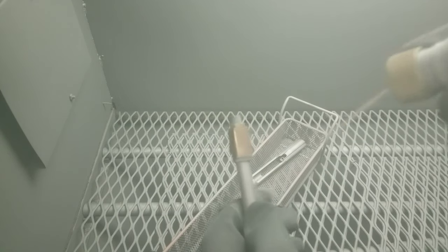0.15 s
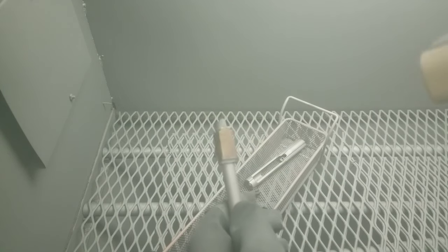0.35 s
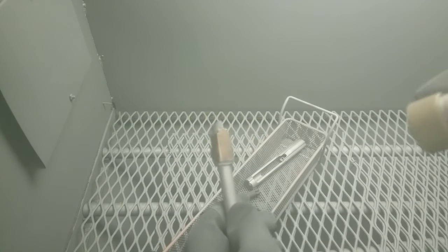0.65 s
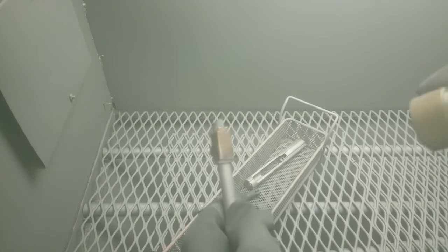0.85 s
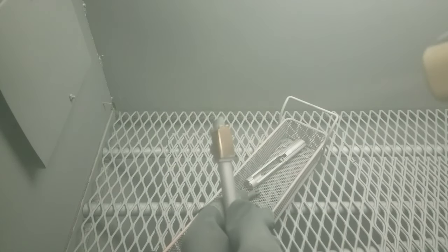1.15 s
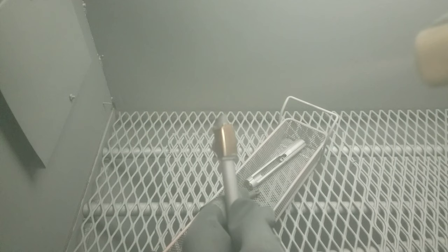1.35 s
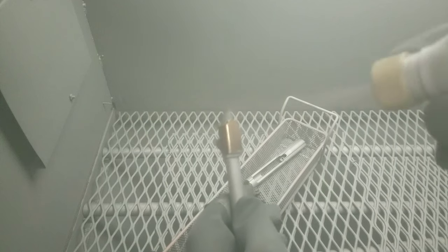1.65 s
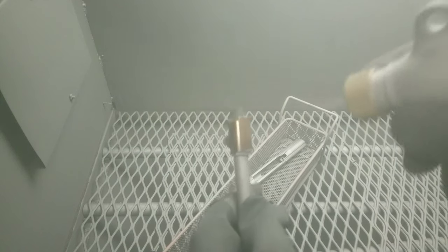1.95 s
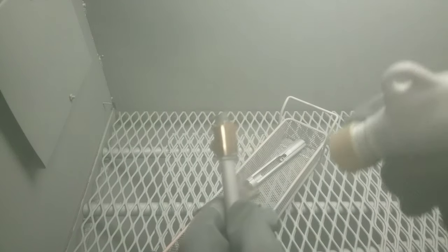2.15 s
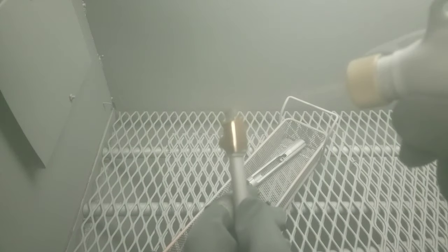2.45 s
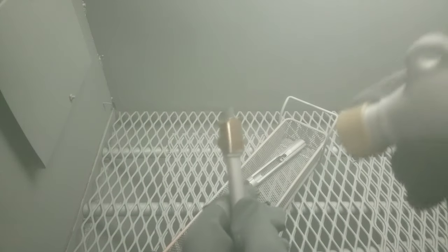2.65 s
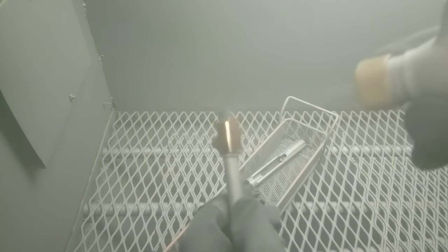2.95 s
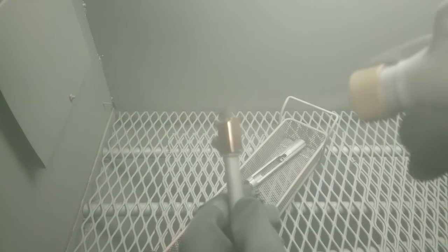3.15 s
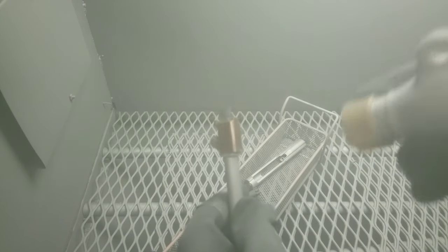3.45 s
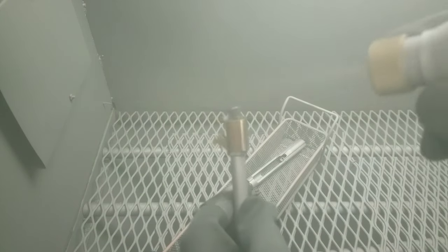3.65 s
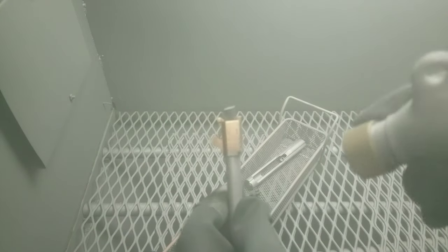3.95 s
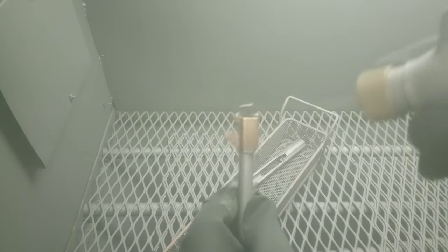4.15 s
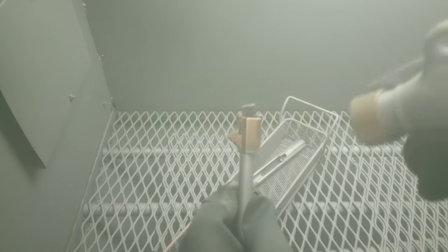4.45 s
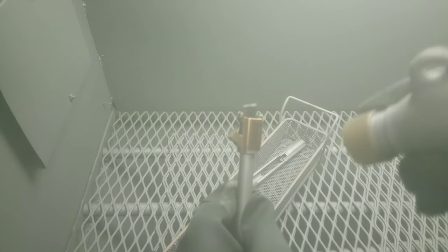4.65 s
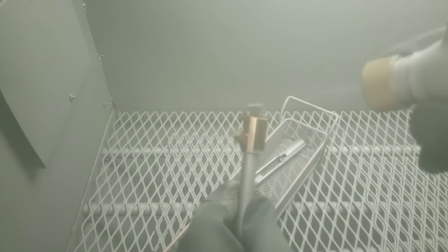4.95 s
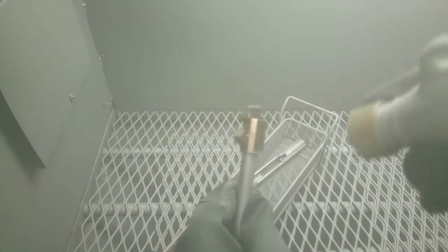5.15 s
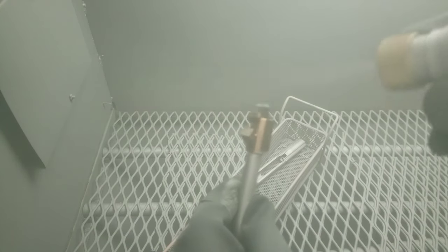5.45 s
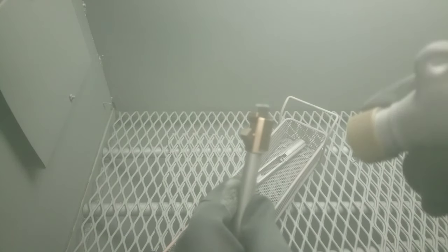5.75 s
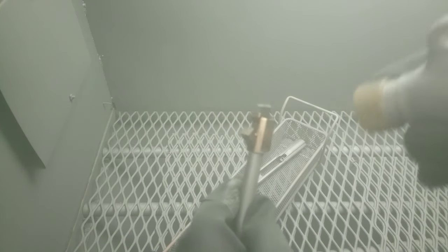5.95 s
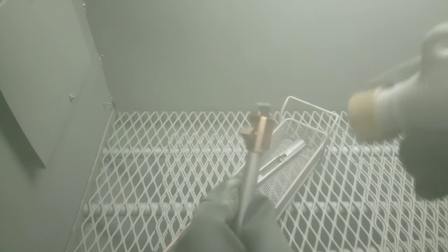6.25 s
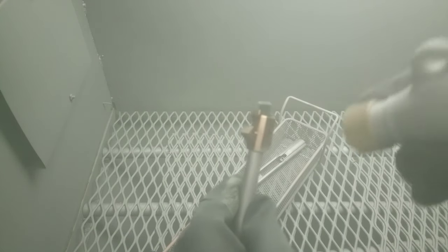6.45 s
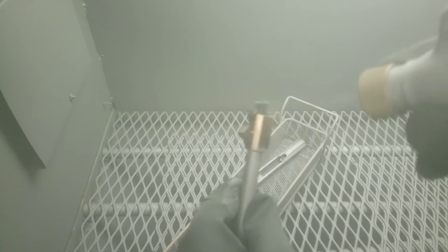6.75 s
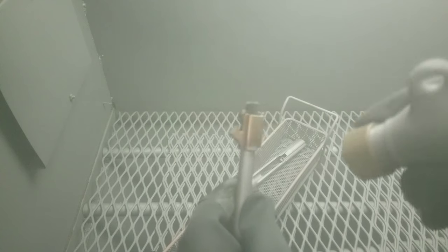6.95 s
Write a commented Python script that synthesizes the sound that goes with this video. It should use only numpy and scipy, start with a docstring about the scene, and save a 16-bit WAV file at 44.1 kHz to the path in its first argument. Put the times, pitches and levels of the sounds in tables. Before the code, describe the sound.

Inside a steel blasting cabinet, an extractor fan hums softly and a blast gun gives two brief, faintly whistling spits of air. It then opens with a bright rush into a loud, continuous hiss, peppered with fine ticks of grit. Each time the jet sweeps across a hand-held metal part, the sound swells into a rasping roar with a faint ring. It is heard up close, with a hollow, boxy tone.

```python
"""An extractor fan hums in a steel blasting cabinet. A spit of air is already dying away as the sound begins,
its nozzle whistling; the gun spits once more, then opens at 0.7 s with a bright rush and stays open. Grit comes
up the hose and ticks on the steel. The air jet hisses on and roars each time it sweeps over a hand-held metal
part; the part rings and the box booms in its air modes. Once it is loud, the camera's gain control slowly turns
down, most of all in the bass."""
import sys
import numpy as np
from scipy import signal
from scipy.fft import rfft, irfft, next_fast_len
from scipy.io import wavfile
from scipy.ndimage import uniform_filter1d, map_coordinates

SR = 44100
rng = np.random.default_rng(int(sys.argv[2]) if len(sys.argv) > 2 else 0)


def log_audio(samples):
    """Write samples as a 16-bit WAV file to the path given in sys.argv[1]."""
    # one column per channel
    frames = np.atleast_2d(samples).T
    # limit to full scale, then quantise
    limited = np.clip(frames, -1, 1)
    pcm = np.round(limited * 32767).astype(np.int16)
    wavfile.write(sys.argv[1], SR, pcm)


N = 313110
TIME_S = np.arange(N) / SR
TRIGGER_S, AIR_RISE_S, GRIT_RISE_S = 0.707, 0.03, 0.093  # grit takes longer to come up the hose
PEAK_LIMIT_SIGMA = 1.7  # caps the random peaks so the hiss does not whistle


def gun():
    """The jet hisses, strikes the part and stirs the air in the box; the grit feed flutters."""
    idle_hiss, idle_roar, idle_churn = seepage()
    roar, churn, ring = sweep()
    modes = standing_waves(width_hz=2.9, widening=0.004)
    feed_db = 0.42 * wobble(17) + 0.62 * wobble(60)
    return (jet_hiss(idle_hiss, feed_db, modes)
            + part_roar(roar + idle_roar, ring, feed_db, modes)
            + box_boom(churn + idle_churn, modes))


def jet_hiss(idle, feed_db, modes, lower_band_hz=5100, left_db=0.4):
    """The free jet: turbulent air and ticking grit, varying as the gun is moved about."""
    # jet spectrum: (frequency [Hz], level [dB])
    spectrum = [(60, -56), (200, -17.5), (700, -24), (1700, -17), (2750, -12.5), (3300, -5.5), (4300, -4),
                (5500, -0.5), (6900, 1.25), (7800, 0), (8700, -4.5), (9800, -6.5), (11500, -3.5),
                (13500, -4.5), (15500, -4.5)]
    # hiss as the gun moves: (time [s], level [dB], extra in the lower band [dB])
    course = [(0.75, -15, 2), (0.92, -12.5, -1), (1.31, -12.5, 1), (1.65, -14.5, -1.0), (1.75, -12.5, -1.5),
              (1.86, -13.5, -0.5), (2.16, -12, -1.5), (2.23, -15.5, 0.5), (2.29, -12, 0.5),
              (2.59, -12.5, -1), (2.99, -10.5, -1), (3.11, -12.5, 2.0), (3.17, -9.5, -0.5),
              (3.58, -11, 1.5), (3.72, -8.0, -1.5), (3.79, -11, -1), (4.15, -10.5, 3), (4.34, -10.0, 0),
              (4.69, -10.5, 4.0), (4.94, -10.5, 0.5), (5.03, -11, 2.5), (5.35, -11.0, 1), (5.45, -10, 2.5),
              (5.56, -11, -3.5), (5.64, -10.0, 0.5), (5.87, -12.0, 3), (6.13, -8.5, 1.5),
              (6.21, -11.5, 3.5), (6.44, -10.5, 2.5), (6.79, -11, 2.0), (7.1, -13, 4.5)]
    jet_db, lower_db = curves(course)
    strength = amp(jet_db) * opening(AIR_RISE_S) + idle
    air = in_box(spectrum, modes, modes_db=-7.5, ripple_db=1.64, ripple_hz=27.98, flicker_db=4.0)
    air = wall_echo(air, delay_s=0.000701, swing=0.2, share=0.28)
    lower = (amp(lower_db) - 1) * filtered(air, lambda hz: 1 / (1 + (hz / lower_band_hz) ** 10))
    ticks = amp(-12.5) * grit(spectrum, rate_hz=540, scatter_db=-1.5, decay_s=0.00016)
    hiss = strength * amp(feed_db) * (air + lower + ticks) + opening_rush(air)
    return hiss * amp([[left_db], [-left_db]])


def part_roar(roar, ring, feed_db, modes):
    """Air splashes off the part with a flickering colour; grit rasps on it and rings it."""
    # spectrum of the jet on the part: (frequency [Hz], level [dB])
    spectrum = [(70, -50), (200, -22.5), (320, -12), (700, -9), (1000, -6.5), (1300, -4), (1550, -2),
                (1850, -2), (2250, -1.3), (3300, -1.9), (4300, -5), (5400, -6.5), (6500, -8.5), (7600, -15),
                (9500, -22), (11500, -13), (15500, -15)]
    splash = in_box(spectrum, modes, modes_db=2.5, ripple_db=2.25, ripple_hz=16, flicker_db=5.5)
    splash = flicker(splash, depth_db=1.4, bins=16, frames=7)
    rasp = amp(-14.0) * grit(spectrum, rate_hz=300, scatter_db=3.0, decay_s=0.00048)
    flutter = amp(feed_db + 0.92 * wobble(36))
    return flutter * (roar * (splash + rasp) + ring * part_ring())


def part_ring(pitch_hz=1666, width_hz=9, lead_rad=-2.16):
    """Grit keeps the part ringing on one note."""
    noise = rng.standard_normal(N)
    return unit(filtered(noise, lambda hz: left_lead(lead_rad) * resonance(hz, pitch_hz, width_hz)))


def box_boom(churn, modes):
    """Churned air booms unevenly in the box's modes."""
    # churn spectrum: (frequency [Hz], level [dB])
    spectrum = [(25, -32), (90, -11), (150, -9.5), (230, -7), (450, -1.5), (750, -1), (1300, -4.5),
                (1700, -4), (2500, -40), (5000, -52)]
    strength = churn * amp(1.25 * wobble(24))
    return strength * in_box(spectrum, modes, modes_db=5.5, ripple_db=2.0, ripple_hz=8.1, flicker_db=2)


def sweep(edge_db=6, edge_exponent=1.13):
    """Roar, churn and ring amplitudes: they swell as the jet nears the part, hold, fade as it leaves."""
    # passes over the part: (square hit [s], hold [s], approach [s], retreat [s],
    # roar [dB], churn [dB], ring [dB])
    passes = [(0.808, 0.16, 0.065, 0.085, -25.5, -27, -40), (1.146, 0.12, 0.094, 0.05, -34.5, -33.5, -50),
              (1.52, 0.21, 0.055, 0.053, -29.5, -31, -45), (1.749, 0.005, 0.036, 0.12, -23.5, -31.5, -46),
              (2.136, 0.043, 0.068, 0.15, -16.5, -30, -33), (2.317, 0.15, 0.048, 0.217, -21, -39, -42),
              (2.75, 0.18, 0.1, 0.092, -14.5, -26.5, -25), (3.198, 0.17, 0.08, 0.088, -22, -40, -42),
              (3.454, 0.058, 0.14, 0.087, -12.5, -24.5, -23), (4.038, 0.11, 0.13, 0.091, -13.5, -25.5, -26),
              (4.608, 0.03, 0.15, 0.089, -12.5, -33, -35), (4.728, 0.036, 0.041, 0.081, -12, -27, -23),
              (5.077, 0.014, 0.17, 0.08, -19, -37, -42), (5.249, 0.093, 0.055, 0.084, -13, -26, -20.5),
              (5.445, 0.027, 0.05, 0.037, -23, -36, -42), (5.717, 0.29, 0.054, 0.19, -16.5, -31, -35),
              (6.45, 0.044, 0.084, 0.05, -11.5, -27, -30), (6.627, 0.017, 0.033, 0.028, -17.5, -41, -39),
              (7, 0.067, 0.18, 0.15, -15, -34.5, -31)]
    roar_power, churn_power, ring_power = amp(-38) ** 2, amp(-47) ** 2, 0  # jet off the part
    for hit_s, hold_s, approach_s, retreat_s, roar_db, churn_db, ring_db in passes:
        off_part = np.maximum(hit_s - TIME_S, 0) / approach_s + since(hit_s + hold_s) / retreat_s
        miss_db = edge_db * off_part ** edge_exponent
        roar_power += amp(roar_db - miss_db) ** 2
        churn_power += amp(churn_db - 0.65 * miss_db) ** 2
        ring_power += amp(ring_db - 0.88 * miss_db) ** 2
    return np.sqrt([roar_power, churn_power, ring_power]) * opening(GRIT_RISE_S)


def grit(spectrum, rate_hz, scatter_db, decay_s):
    """Single grains of uneven size tick against steel."""
    hits = (rng.random(N) < rate_hz / SR) * amp(scatter_db * np.minimum(rng.exponential(size=N), 4))
    envelope = signal.fftconvolve(hits, np.exp(-TIME_S[:SR // 100] / decay_s))[:N]
    return coloured(envelope * rng.standard_normal((2, N)), spectrum)


def opening_rush(air, rush_decay_s=0.025, ring_decay_s=0.11):
    """Pressure stored in the hose escapes in a short, bright rush that rings in the nozzle."""
    t = since(TRIGGER_S)
    bright = unit(filtered(air, lambda hz: np.abs(resonance(hz, centre_hz=11700, width_hz=3800)) ** 2))
    rush = amp(-11.5) * np.exp(-t / rush_decay_s) * bright
    ring = amp(-25) * np.exp(-t / ring_decay_s) * nozzle_tone(diffuse(), pitch_hz=5140, width_hz=2500)
    return opening(AIR_RISE_S) * (rush + ring)


def nozzle_puffs(attack_s):
    """With the trigger barely open, each puff whistles briefly at the nozzle's resonances."""
    # whistles: (time [s], pitch [Hz], width [Hz], level [dB], t60 [s])
    puffs = [(0, 2960, 380, -30, 0.14), (.61, 4750, 700, -39, 0.2), (.61, 6960, 900, -41, 0.16),
             (.61, 10600, 600, -48, .22), (.61, 12800, 600, -56, .2)]
    out = np.zeros((2, N))
    for start_s, pitch_hz, width_hz, db, t60_s in puffs:
        tone = nozzle_tone(rng.standard_normal((2, N)), pitch_hz, width_hz)
        out += amp(db) * burst(start_s, attack_s, t60_s) * tone
    return out


def nozzle_tone(noise, pitch_hz, width_hz):
    """Air noise through one nozzle resonance, rms 1."""
    return unit(filtered(noise, lambda hz: resonance(hz, pitch_hz, width_hz) ** 2))


def seepage():
    """Hiss, roar and churn amplitudes of the closed gun: a faint leak and brief spits."""
    # spits of air: (time [s], hiss [dB], roar [dB], churn [dB], rise [s], t60 [s])
    spits = [(0, -34.5, -37.5, -34, 0.0006, 0.34), (.607, -33.5, -36, -41, 0.016, 0.17)]
    strength = amp([[-53], [-52.5], [-65]])  # steady leak
    for start_s, hiss_db, roar_db, churn_db, rise_s, t60_s in spits:
        spit = amp([[hiss_db], [roar_db], [churn_db]]) * burst(start_s, rise_s, t60_s)
        strength = np.hypot(strength, spit)
    return strength


def standing_waves(width_hz, widening):
    """Stereo response of the box's modes; the higher ones are more damped."""
    # air modes: (frequency [Hz], relative level [dB], left lead [rad])
    modes = [(168, 4, 0.0), (186, 2, 0.0), (239, 10, -0.1), (253, 6, -0.1), (268, 7, -0.2), (301, 3, -0.5),
             (348, 11, -0.8), (388, 2, -0.6), (415, 6, -0.5), (434, 3, -0.1), (485, 4, -0.8),
             (510, 3, -0.8), (615, -1, -0.9), (634, -1, -0.9), (675, 0, 1.9), (717, 6, 0.8), (750, 0, 1.2),
             (785, 1, 1.5), (840, 5, 3.0), (899, 1, 2.0), (947, 0, -2.6), (983, 0, -1.6), (1034, 2, 1.1),
             (1120, 1, -3.1), (1141, 2, 0.1), (1200, 2, 2.1), (1357, 2, 1.9), (1475, 2, -2.5),
             (1523, 1, -1.1), (1545, 0, -0.8), (1571, 1, 0.2), (2090, 0, -1.5), (2153, 0, -2.2),
             (2207, 1, -1.0), (2266, 2, 0.0), (2498, 0, 0.3), (2795, 0, -2.1), (2929, 0, -1.9),
             (3246, 0, 0.2), (4780, 1, -2.4), (5330, 2, 3.1), (5426, 4, 2.4), (7230, 1, 0.6),
             (7700, 2, -1.4), (11290, 3, 0.3)]
    grid_hz = np.arange(SR // 2)
    pair = sum(amp(db) * resonance(grid_hz, mode_hz, width_hz + widening * mode_hz) * left_lead(lead_rad)
               for mode_hz, db, lead_rad in modes)
    return lambda hz: np.array([np.interp(hz, grid_hz, side) for side in pair])


def in_box(spectrum, modes, modes_db, ripple_db, ripple_hz, flicker_db):
    """Turbulence in the box, rms 1: strong single modes over a ripple of many overlapping ones."""
    knots = np.minimum(rng.standard_normal((2, SR // 4)), PEAK_LIMIT_SIGMA)

    def ripple(hz):
        return amp(ripple_db * np.array([np.interp(hz / ripple_hz, np.arange(len(k)), k) for k in knots]))

    overlapping = flicker(filtered(diffuse(), ripple), flicker_db, bins=2, frames=14)
    single = amp(modes_db) * filtered(rng.standard_normal(N), modes)
    return coloured(overlapping + single, spectrum)


def wall_echo(x, delay_s, swing, share):
    """The echo's path changes as the hand moves: a slowly shifting comb."""
    n = np.arange(N)
    echo = [np.interp(n - SR * delay_s * (1 + swing * wobble(2.5)), n, side) for side in x]
    return unit(x + share * np.array(echo))


def flicker(x, depth_db, bins, frames):
    """Random narrow dips and low peaks come and go, giving the noise a swirling texture."""
    spectra = signal.stft(x, nperseg=1024)[2]
    field = uniform_filter1d(rng.standard_normal(spectra.shape), bins, axis=1)
    for _ in range(2):
        field = uniform_filter1d(field, frames, axis=2)
    gain = amp(depth_db * np.minimum(unit(field), PEAK_LIMIT_SIGMA))
    return unit(signal.istft(spectra * gain, nperseg=1024)[1][:, :N])


def extractor(jitter_s=0.00027):
    """The fan's slightly unsteady hum and the draught it pulls through the box."""
    # motor and housing tones: (frequency [Hz], level [dB])
    tones = [(59.3, -45), (118.6, -53), (213, -58.5), (242.2, -51), (301.5, -58), (376.8, -60), (401, -60),
             (419, -50.5), (468.3, -60), (592.2, -61)]
    # draught spectrum: (frequency [Hz], level [dB])
    draught = [(20, -24), (40, -3), (80, -1.5), (135, -6.5), (210, 0), (270, -2), (340, -4), (430, -10),
               (600, -9.5), (1300, -18), (2500, -24.5), (3700, -19.5), (6200, -28.5), (7700, -27),
               (9000, -32), (15500, -37)]
    hum = np.zeros(N)
    for hz, db in tones:
        peak = np.sqrt(2) * amp(db + 2.0 * wobble(9))
        phase_rad = 2 * np.pi * hz * (TIME_S + jitter_s * wobble(4.48)) + rng.uniform(0, 2 * np.pi)
        hum += peak * np.sin(phase_rad)
    return hum + amp(-41.5) * coloured(diffuse(), draught)


def diffuse():
    """White stereo noise, left and right alike in the bass only."""
    # left-right likeness: (frequency [Hz], correlation [-1..1])
    likeness = [(60, 0.91), (250, 0.84), (480, 0.46), (750, -0.082), (1200, -0.42), (3300, 0.29),
                (5300, -0.41), (7000, 0.12), (15000, -0.096)]

    def mid_side(hz):
        angle_rad = np.arccos(np.clip(along(likeness, hz), -1, 1)) / 2
        return np.array([np.cos(angle_rad), np.sin(angle_rad)])

    mid, side = filtered(rng.standard_normal((2, N)), mid_side)
    return np.array([mid + side, mid - side])


def opening(rise_s):
    """0 before the trigger is pulled, then smoothly up to 1."""
    return np.sin(np.pi / 2 * np.minimum(since(TRIGGER_S) / rise_s, 1)) ** 2


def burst(start_s, rise_s, t60_s):
    """Envelope with exponential rise and decay."""
    t = since(start_s)
    return (1 - np.exp(-t / rise_s)) * amp(-60 * t / t60_s)


def since(start_s):
    return np.maximum(TIME_S - start_s, 0)


def amp(db):
    return 10 ** (np.asarray(db) / 20)


def unit(x):
    return x / np.sqrt(np.mean(x ** 2) + 1e-20)


def left_lead(rad):
    return np.exp([[.5j * rad], [-.5j * rad]])


def along(points, hz):
    """Interpolate (frequency [Hz], value) points on a log axis."""
    knots_hz, values = np.transpose(points)
    return np.interp(np.log(hz + 1), np.log(knots_hz + 1), values)


def curves(rows):
    """One value per sample for each column after the time."""
    knots_s, *columns = np.transpose(rows)
    return [np.interp(TIME_S, knots_s, column) for column in columns]


def wobble(rate_hz):
    """Smooth random curve, rate_hz knots a second."""
    return map_coordinates(rng.standard_normal(int(N * rate_hz / SR) + 4), [TIME_S * rate_hz])


def filtered(x, response):
    """x through a complex frequency response."""
    size = next_fast_len(N + SR // 2)
    return irfft(rfft(x, size) * response(np.fft.rfftfreq(size, 1 / SR)), size)[..., :N]


def coloured(x, spectrum):
    """x shaped by a spectrum table, rms 1."""
    return unit(filtered(x, lambda hz: amp(along(spectrum, hz))))


def resonance(hz, centre_hz, width_hz):
    """Response of one damped mode, 1 at its centre."""
    return 1j * hz * width_hz / (centre_hz ** 2 - hz ** 2 + 1j * hz * width_hz)


def gain_control(x, threshold_db, glide_s, range_db, bass_db, bass_hz):
    """While the input is loud the gain glides down to the end of its range; the bass is cut further."""
    power = np.abs(uniform_filter1d(np.mean(x ** 2, axis=0), SR // 50))
    loud_s = np.cumsum(power > amp(threshold_db) ** 2) / SR
    turned = np.minimum(loud_s / glide_s, 1)
    bass = filtered(x, lambda hz: 1 / (1 + (hz / bass_hz) ** 4))
    return amp(-range_db * turned) * (x - bass + amp(-bass_db * turned ** 2) * bass)


def scene():
    """The gun and its whistling puffs over the fan."""
    return gun() + nozzle_puffs(attack_s=0.0027) + extractor()


def record(dry):
    """The camera rides its gain and keeps nothing above its band limit."""
    ridden = gain_control(dry, threshold_db=-31, glide_s=1.19, range_db=9, bass_db=10.5, bass_hz=145)
    return filtered(ridden, lambda hz: hz < 15560)


dry = scene()
out = record(dry)
log_audio(out)
```